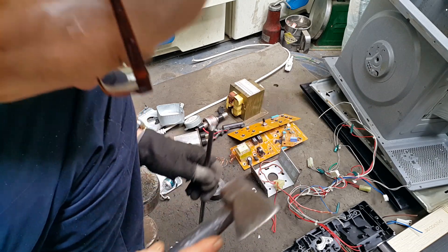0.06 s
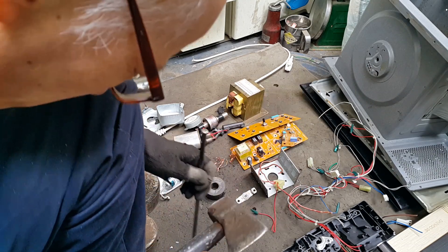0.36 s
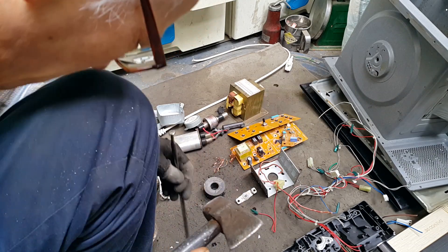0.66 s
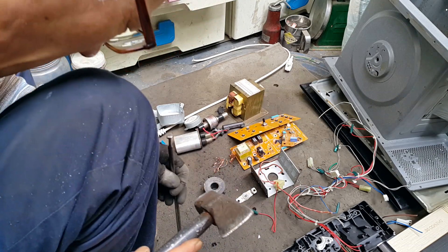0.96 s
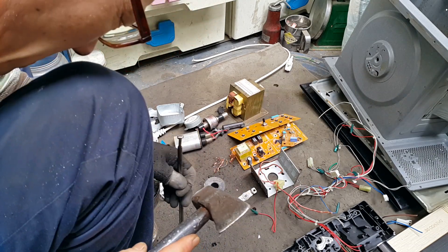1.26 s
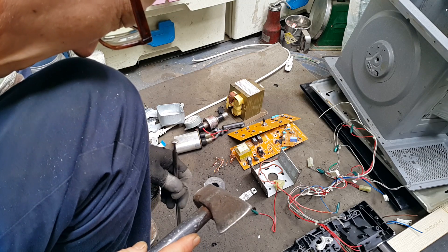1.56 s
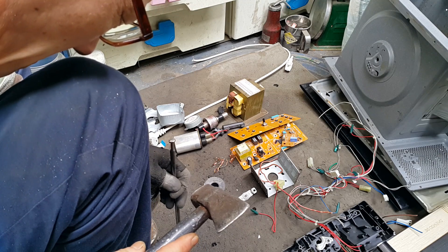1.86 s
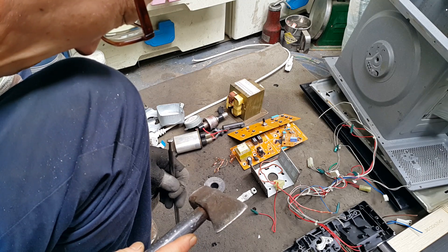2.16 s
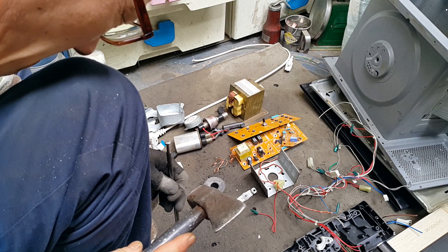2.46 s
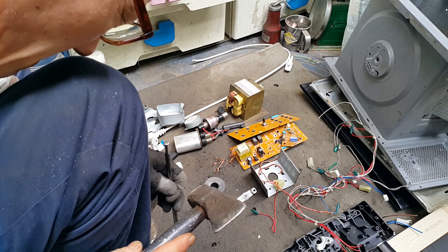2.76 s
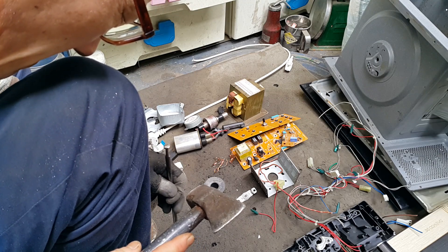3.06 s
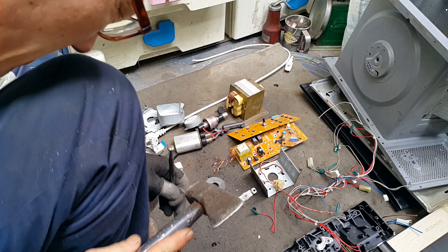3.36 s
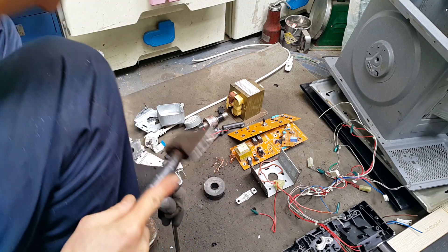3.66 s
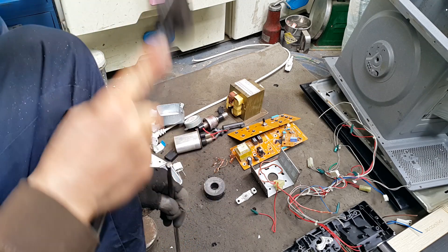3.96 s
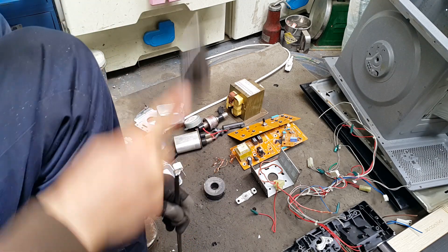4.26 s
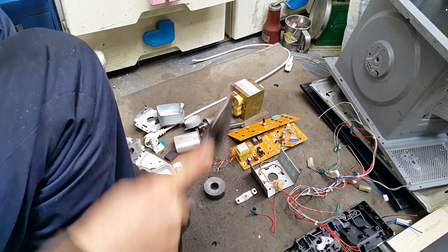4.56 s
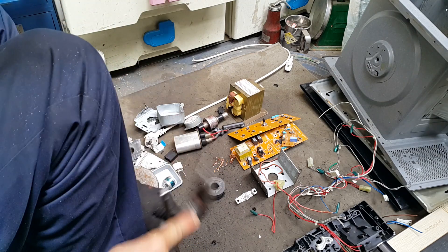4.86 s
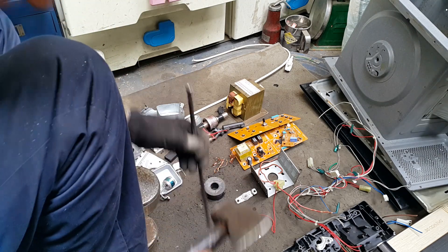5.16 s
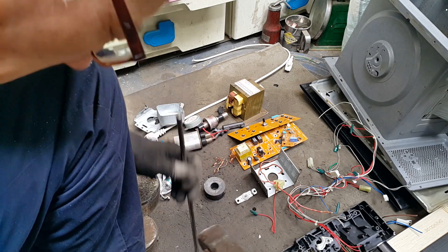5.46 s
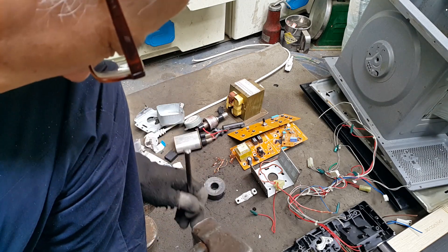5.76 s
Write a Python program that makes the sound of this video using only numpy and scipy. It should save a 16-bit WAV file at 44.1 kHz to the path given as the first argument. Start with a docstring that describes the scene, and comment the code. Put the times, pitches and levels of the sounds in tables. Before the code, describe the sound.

A hammer strikes a steel rod against a metal part three times, close up in a small workshop, after faint tool ticks.

```python
"""Three hammer blows on a steel rod held against a metal part on a workshop floor, heard close up. Each blow is
a few milliseconds of clatter, a short ring of steel and a thump of the floor, in a small room. Throughout, the
tools tick softly as they are lined up, and before the blows a far bird chirps, over a steady drone and hiss and
the fading hum of a metal panel. An automatic volume control turns the quiet pause up and drops back at the
first blow."""
import sys
import numpy as np
from scipy import signal
from scipy.fft import rfft, irfft, next_fast_len
from scipy.io import wavfile
from scipy.ndimage import uniform_filter1d, minimum_filter1d

SR = 44100
rng = np.random.default_rng(int(sys.argv[2]) if len(sys.argv) > 2 else 0)


def persist_wave(psi):
    """Save psi, clipped to +-1, as 16-bit WAV."""
    counts = np.round(np.clip(psi, -1, 1) * 32767).astype(np.int16)
    wavfile.write(sys.argv[1], SR, np.atleast_2d(counts).T)


N = 265041


# One row per blow; levels are boosts or cuts: t/s, force/dB, treble tilt/dB per octave, clank/dB,
# thump/dB, room/dB, rod pitch/Hz, bounce delay/s, bounce level/dB
BLOWS = [(4.2575, 0.5, 0.25, 7.5, 2, 2, 4103, 0.028, -12), (4.6077, -5, 0.5, 5.5, 3, 1.5, 4214, 0.011, -3),
         (4.956, 1.5, 0.04, -7, -4, -4, 4200, .026, -14)]
# Tone of the clatter's echo: f/Hz, relative level/dB
ECHO_TONE = [(88, -33.5), (150, -6.5), (240, -5.5), (297, -10), (624, -14), (730, -10.5), (1120, -9),
             (1560, -6), (2270, -9), (2600, -8), (3700, -9.5), (4160, -4), (5910, -18), (9820, -18.5),
             (16000, -26.5)]

def hammer():
    """Each blow clatters, rings the steel and thumps the floor; the room answers."""
    out, t = np.zeros((2, N)), np.arange(SR * 3 // 4) / SR
    for start, force_db, tilt_db, clank_db, thump_db, room_db, rod_hz, bounce_s, bounce_db in BLOWS:
        metal = steel_ring(t, tilt_db, clank_db, rod_hz)
        crack = clatter(t, tilt_db, bounce_s, bounce_db)
        direct = amp(-8.5) * crack + amp(-17.5) * metal + amp(thump_db) * floor_thump(t)
        crack_echo = amp(10.5) * colour(room_tail(build_s=0.008), ECHO_TONE, tilt_db)
        ring_echo = amp(-24.5) * signal.fftconvolve(metal, room_tail(build_s=0.004), axes=1)[:, :len(t)]
        echo = amp(room_db) * (crack_echo + ring_echo) * pan(0.9)
        add(out, start, amp(force_db) * (microphone_pair(direct) + echo))
    return out


# Tone of metal hitting metal: f/Hz, relative level/dB
CLATTER_TONE = [(180, -33), (300, -9.5), (1100, -1), (2320, -5.5), (3030, 2), (3640, -2), (4230, 9),
                (5700, -15), (7690, -19), (8500, -24), (9090, -20.5), (11700, -10.5), (16000, -26.5)]

def clatter(t, tilt_db, bounce_s, bounce_db, contact_s=0.006, rough_db=7.0):
    """Hammer, rod, part and floor rattle together for a moment; the part hops and lands again."""
    hit = np.exp(-(t / contact_s) ** 4)
    landing = amp(bounce_db) * np.exp(-((t - bounce_s - contact_s / 2) / (0.7 * contact_s)) ** 4)
    noise = 0.9 * rng.standard_normal(len(t)) + stereo_noise(len(t))  # first term: same on both sides
    grains = unit(noise * amp(rough_db * rng.standard_normal(len(t))))
    return colour(grains * (hit + landing + 0.054 * fade(t, 0.065)), CLATTER_TONE, tilt_db)


# Ringing notes of the struck part: f/Hz, relative level/dB, fade time/s
PART_NOTES = [(712, -17, 0.31), (813, -2.5, 0.054), (856, -13, 0.073), (921, -8.5, 0.11),
              (997.4, -4.5, 0.079), (1076, -2, 0.049), (1185, -9, 0.053), (1316, -4.5, .045),
              (1430, -7, 0.086), (1750, -12.5, 0.044), (1730, -11, .05), (1813, -2.5, 0.069),
              (1932, -4.5, 0.07), (2480, -6, 0.048), (2874, 1, 0.042), (3094, -2, 0.061), (4330, -4, 0.099),
              (4800, 0, 0.013), (5190, 3, 0.032), (6340, -10.5, 0.024), (6920, -7.5, 0.03),
              (8750, -10.5, 0.027), (8060, -15.5, .035), (9630, -7, 0.017), (11040, -13, 0.019),
              (11700, -10.5, .03)]
# Notes of the rod as it bends: multiple of its pitch, relative level/dB, fade time/s
ROD_NOTES = [(0.967, -5.5, .03), (.985, 0, .045), (0.999, 1, 0.028), (1.017, -5, 0.046), (1.018, -20.5, .3),
             (1.008, -17, 0.29)]

def steel_ring(t, tilt_db, clank_db, rod_hz, clank_hz=1000):
    """Part and rod ring together; how squarely the blow lands decides how much the low notes clank."""
    rod = ring(t, [(ratio * rod_hz, db + 3 * tilt_db, fade_s) for ratio, db, fade_s in ROD_NOTES])
    hz, db, fade_s = np.transpose(PART_NOTES)
    clank_band = np.exp(-2 * np.log2(hz / clank_hz) ** 2)
    db = db + tilt_db * np.log2(hz / 2000) + clank_db * clank_band
    part = ring(t, zip(hz, db, fade_s))
    return (part + amp(6.0) * rod)[None]


# Deep notes of floor and room, and the long hum of the metal panel:
# f/Hz, relative level/dB, fade time/s, swell time/s
THUMP_NOTES = [(62, -25, 0.35, 0.039), (66, -32.5, 0.13, 0.021), (120, -16.5, 0.19, 0.017),
               (131.5, -38, 0.72, 0.0092), (157, -55, 2.8, .01), (260, -27, 0.22, 0.0047),
               (302, -9, 0.036, 0.0023), (341, -25.5, 0.067, .002), (425, -38.5, 0.1, 0.0042),
               (500, -33, 0.19, 0.0019)]

def floor_thump(t):
    """The floor is pushed down; its deep notes, the room's and the metal panel's hum swell behind it."""
    return sum(amp(db) * (1 - np.exp(-t / swell_s)) * fade(t, fade_s) * np.sin(2 * np.pi * hz * t)
               for hz, db, fade_s, swell_s in THUMP_NOTES)


# How much louder a blow is on the left: f/Hz, level/dB
LEFT_BOOST = [(100, 3), (400, 6), (1200, 6), (2500, 0.5), (4200, 1), (8000, -10), (14000, 1)]

def microphone_pair(x, lag_s=0.00013):
    """The direct sound reaches the right microphone a little later, and brighter."""
    size = 2 * x.shape[1]
    hz = np.fft.rfftfreq(size, 1 / SR)
    left = amp(look_up(LEFT_BOOST, hz) / 2)
    right = np.exp(-2j * np.pi * hz * lag_s) / left
    return irfft(rfft(x, size) * [left, right])[:, :x.shape[1]]


# How long the workshop echoes: f/Hz, fade time/s
ROOM_FADE = [(150, .42), (400, 0.36), (1000, 0.23), (2500, 0.24), (5000, 0.22), (9000, 0.21), (16000, 0.17)]

def room_tail(build_s, count=SR * 3 // 4):
    """Echoes off the walls pile up, then die away, the high ones first."""
    hz, t, bands = signal.stft(stereo_noise(count), SR, nperseg=256)
    bands = bands * fade(t, look_up(ROOM_FADE, hz)[:, None])
    tail = signal.istft(bands, SR, nperseg=256)[1][:, :count]
    build_up = 1 - np.exp(-np.arange(count) / SR / build_s)
    return unit(tail * build_up) / np.sqrt(count)


# The clearest knocks of the tools: t/s, level/dB, f/Hz
TOOL_KNOCKS = [(0.1326, -64, 1270), (0.8992, -54, 730), (2.58, -68, 5330), (2.6474, -61, 540),
               (3.867, -58.5, 496), (5.17, -56.5, 2830)]

def tool_ticks(touches_per_s=2.2, touch_db=-73.5, spread_db=2, touch_hz=4230, spread_octaves=0.43):
    """The tools are lined up: a few clear knocks among faint random touches."""
    out = np.zeros((2, N))
    for start, db, hz in TOOL_KNOCKS:
        add(out, start, knock(db, hz))
    for when, strength, pitch in rng.uniform(-1.2, 1, (round(touches_per_s * N / SR), 3)):
        touch = knock(touch_db + spread_db * strength, touch_hz * 2 ** (spread_octaves * pitch))
        add(out, abs(when) * N / SR, touch)
    return out


def knock(db, hz, fade_s=0.026, echo=0.27):
    """A light touch of rod or hammer: a short click, strongest at hz, and a little echo."""
    t = np.arange(SR // 4) / SR
    click = stereo_noise(len(t)) * (fade(t, fade_s) + echo * fade(t, 0.16))
    tone = [(hz / 6, -20), (hz * 0.7, -7), (hz, 0), (hz * 1.3, -14), (hz * 4, -32), (hz * 12, -55)]
    return amp(db) * colour(click, tone)


# The bird's chirps: t/s, length/s, top pitch/Hz, relative level/dB
CHIRPS = [(1.356, 0.11, 5640, -7), (2.006, 0.088, 4070, -8.5), (2.069, 0.05, 4140, -2.5),
          (2.225, 0.14, 5420, -13.5), (2.534, .15, 4410, -14.5), (2.911, 0.14, 4500, -11),
          (3.154, 0.13, 4800, -14.5), (3.554, 0.13, 4780, -13.5), (4.088, .12, 4390, -16.5)]

def bird(start_hz=3120, climb_hz_per_s=42000, waver=0.028, rasp=0.55, echo_s=0.96):
    """Raspy rising whistles that level off, blurred by the walls on their way in."""
    song = np.zeros((1, N))
    for start, length, top_hz, db in CHIRPS:
        t, span_hz = np.arange(int(length * SR)) / SR, top_hz - start_hz
        jitter, shimmer = unit(uniform_filter1d(rng.standard_normal((2, SR)), 70))[:, :len(t)]
        glide = top_hz - span_hz * np.exp(-t * climb_hz_per_s / span_hz)  # high chirps climb longer
        hz = glide * (1 + waver * jitter)
        swell = np.sqrt(abs(np.sin(np.pi * t / length))) * (1 + rasp * shimmer)
        add(song, start, amp(db) * swell * np.sin(2 * np.pi * np.cumsum(hz) / SR))
    t = np.arange(SR // 2) / SR
    walls = rng.standard_normal((2, len(t))) * (fade(t, echo_s) + 3.2 * fade(t, 0.035))
    return amp(-58.0) * signal.fftconvolve(song, unit(walls) / np.sqrt(len(t)), axes=1)[:, :N]


def panel_hum(hz=157.0, fade_s=2.8):
    """A sheet-metal panel is still humming from an earlier knock."""
    t = np.arange(N) / SR
    return amp(-59.0) * fade(t, fade_s) * np.sin(2 * np.pi * hz * t) * pan(3.9)


# Tones of the three background noises: f/Hz, relative level/dB
DRONE_TONE = [(20, -21), (42, -9), (58, 4.5), (80, -16.5), (105, 3), (135, -9.5), (180, -13), (240, -37.5)]
WASH_TONE = [(110, -39), (180, -14.5), (235, 0.5), (341, -9.5), (545, -10), (600, -9.5), (1030, -8),
             (1190, -13), (1820, -16.5), (2700, -25), (3200, -42.5), (4160, -54), (7040, -120)]
HISS_TONE = [(2200, -6.5), (3200, 8), (4500, 1), (5000, 5.5), (5600, 10), (6100, -5), (7500, 0.5),
             (9000, -15), (14000, -9), (15400, -3), (16200, -11.5)]

def background():
    """Low drone, a wash of distant noise and thin hiss, all steady."""
    size = next_fast_len(N, real=True)
    hz = np.fft.rfftfreq(size, 1 / SR)
    out = np.zeros((2, N))
    for tone, db, left_db in [(DRONE_TONE, -70.5, 3), (WASH_TONE, -67, 2.5), (HISS_TONE, -79, 0.5)]:
        spectrum = rfft(stereo_noise(size)) * amp(look_up(tone, hz))
        out += unit(irfft(spectrum, size)[:, :N]) * amp(db) * pan(left_db)
    return out


# How alike left and right are: f/Hz, likeness (1 = the same, 0 = unrelated)
LIKENESS = [(60, 0.7), (150, 0.89), (380, 0.8), (950, 0), (2380, -0.11), (5980, 0), (15000, 0)]

def stereo_noise(count):
    """White noise at two nearby microphones: alike in the bass, unrelated in the treble."""
    size = next_fast_len(count, real=True)
    left, other = rfft(rng.standard_normal((2, size)))
    alike = look_up(LIKENESS, np.fft.rfftfreq(size, 1 / SR))
    right = alike * left + np.sqrt(1 - alike ** 2) * other
    return irfft(np.array([left, right]), size)[:, :count]


def ring(t, notes):
    """Adds up fading pure tones, each starting at a random point in its wave."""
    return sum(amp(db) * fade(t, fade_s) * np.sin(2 * np.pi * (hz * t + rng.random()))
               for hz, db, fade_s in notes)


def colour(x, tone, tilt_db=0, size=4096):
    """Filters x by a tone table, tilted by tilt_db per octave around roughly 2 kHz."""
    hz = abs(np.fft.fftfreq(size, 1 / SR))
    gain = unit(amp(look_up(tone, hz))) * amp(tilt_db * np.log2((hz + 200) / 2000))
    response = np.exp(np.conj(signal.hilbert(np.log(gain + 1e-5))))  # never rings before the hit
    taps = np.fft.ifft(response).real[:size // 2]
    return signal.fftconvolve(x, taps[None], axes=1)[:, :x.shape[1]]


def fade(t, fade_s):
    """A curve that falls by 60 dB in the fade time."""
    return np.exp(-np.log(1000) * t / fade_s)


def amp(db):
    """Turns decibels into a multiplier."""
    return 10 ** (np.asarray(db) / 20)


def unit(x):
    """Scales to an average power of one."""
    return x / np.sqrt(np.mean(x ** 2) + 1e-20)


def pan(left_db):
    """Left and right multipliers that make the left louder by left_db."""
    return amp([[left_db / 2], [-left_db / 2]])


def look_up(table, hz):
    """Reads between a table's rows, giving each octave about equal space."""
    row_hz, value = np.transpose(table)
    return np.interp(np.log(hz + 1), np.log(row_hz + 1), value)


def add(mix, start_s, sound):
    """Mixes a sound in at the given time."""
    part = mix[:, round(start_s * SR):][:, :sound.shape[-1]]
    part += sound[..., :part.shape[1]]


def volume_control(x, lift_db=11.5, loud_db=-25, first_hold_s=0.75, hold_s=1.3, recover_s=0.21):
    """The volume starts low, creeps up in the quiet, and drops and waits at each loud sound."""
    t = np.arange(N) / SR
    ahead = round(0.008 * SR)  # starts dropping just before the sound
    loud = abs(x).max(0) > amp(loud_db)
    held_until = np.maximum.accumulate(np.where(loud, t + hold_s, first_hold_s))
    boost_db = lift_db * (1 - np.exp(-np.maximum(t - held_until, 0) / recover_s))
    return x * amp(uniform_filter1d(minimum_filter1d(boost_db, 2 * ahead), ahead))


def scene():
    """Everything heard in the workshop."""
    return hammer() + bird() + background() + panel_hum() + tool_ticks()


def record(dry):
    """The recorder sets its volume, rounds off the loudest peaks and cuts the highest treble."""
    ceiling, cutoff_hz = 0.9, 16300
    levelled = volume_control(dry)
    rounded = levelled / (1 + (levelled / ceiling) ** 6) ** (1 / 6)
    treble_cut = signal.firwin(511, cutoff_hz, window=("kaiser", 9), fs=SR)
    return signal.oaconvolve(rounded, treble_cut[None], "same")


dry = scene()
out = record(dry)
persist_wave(out)
```